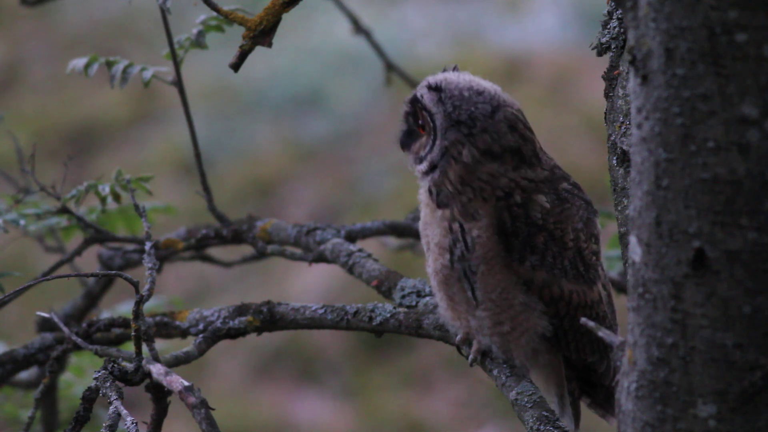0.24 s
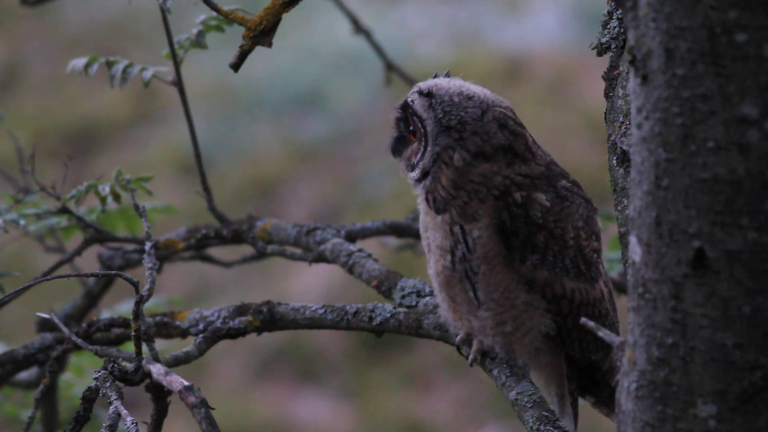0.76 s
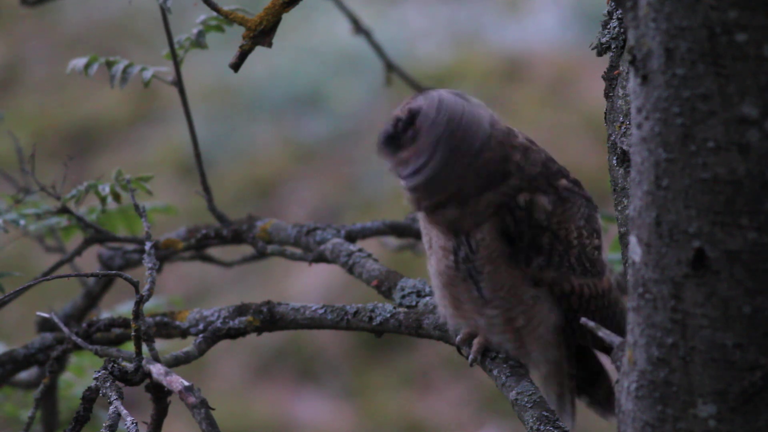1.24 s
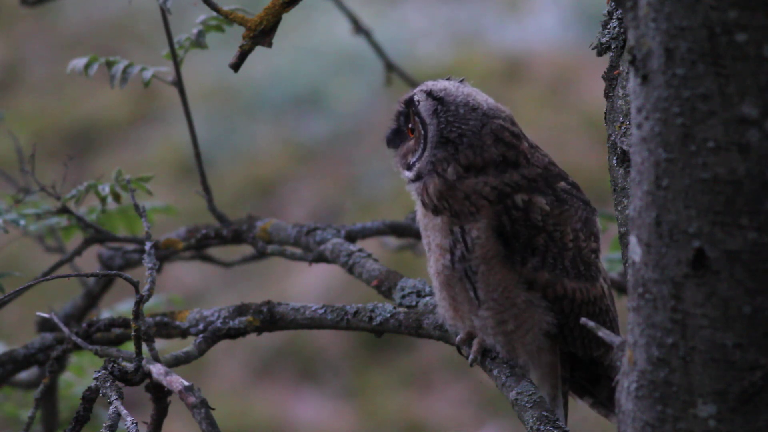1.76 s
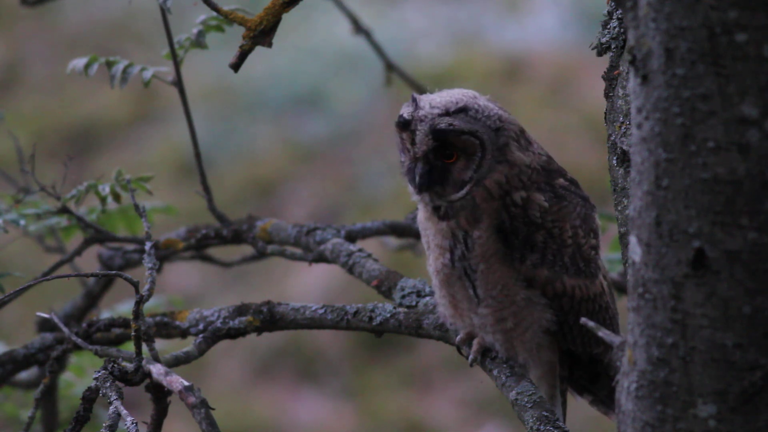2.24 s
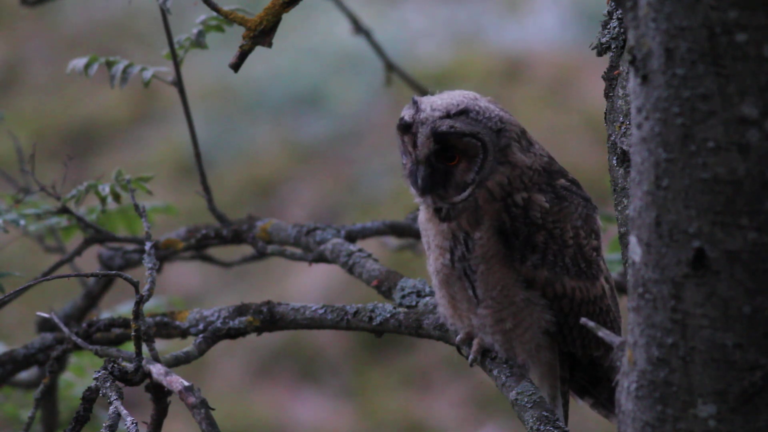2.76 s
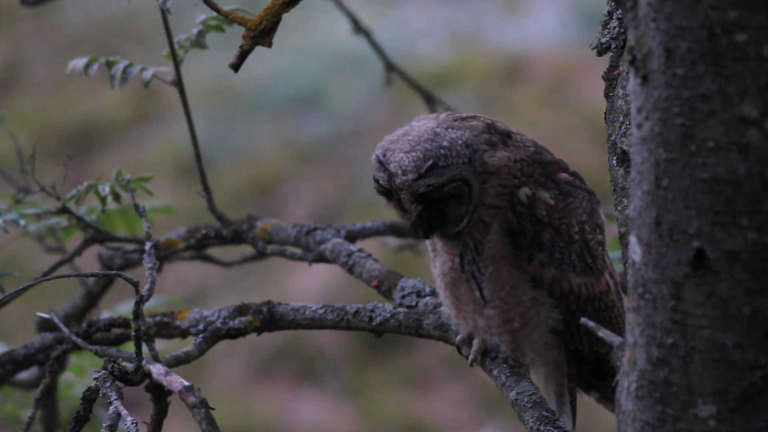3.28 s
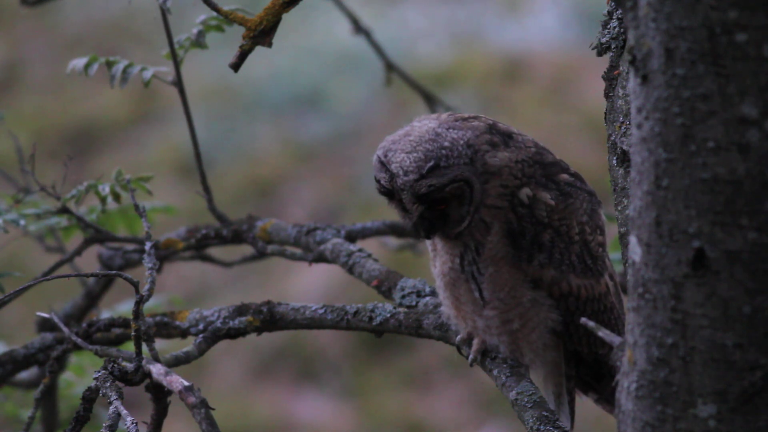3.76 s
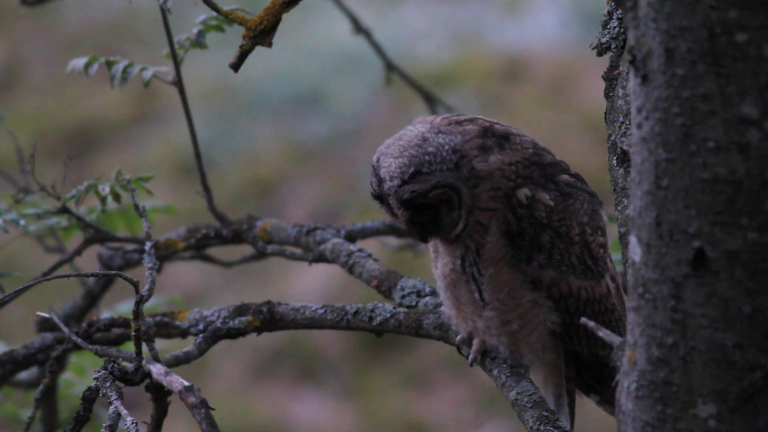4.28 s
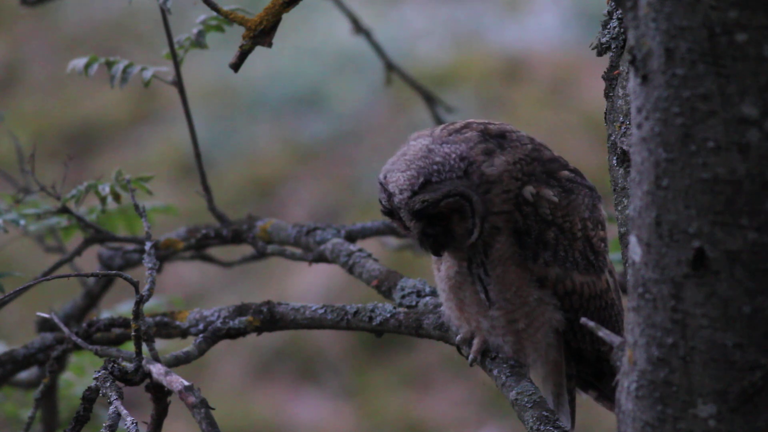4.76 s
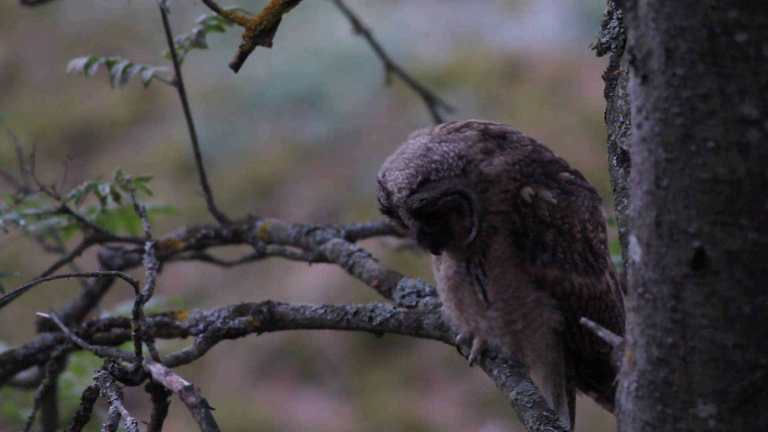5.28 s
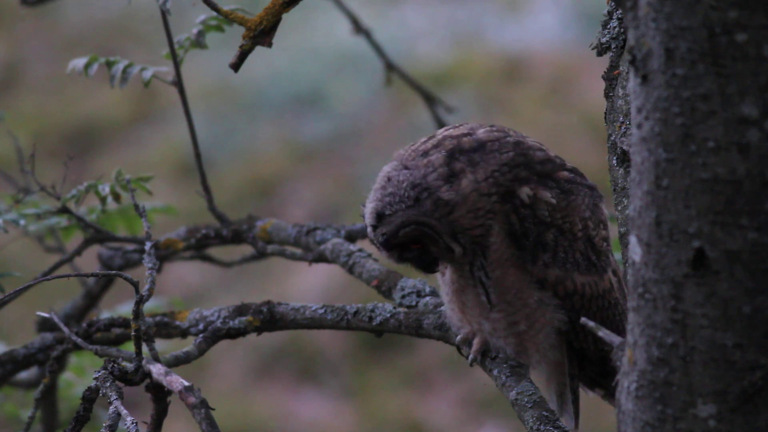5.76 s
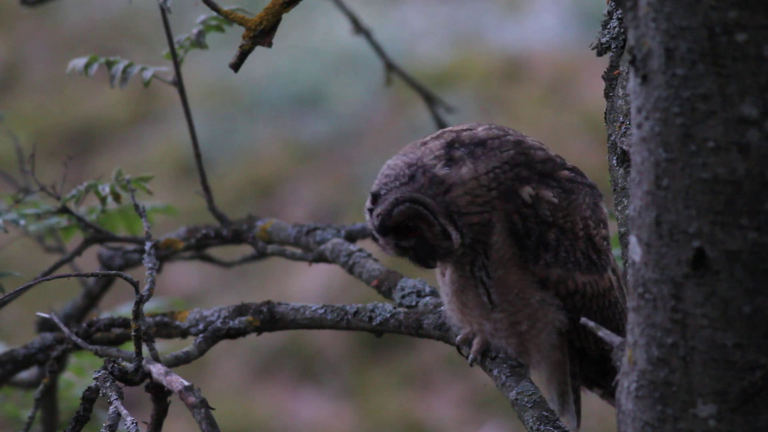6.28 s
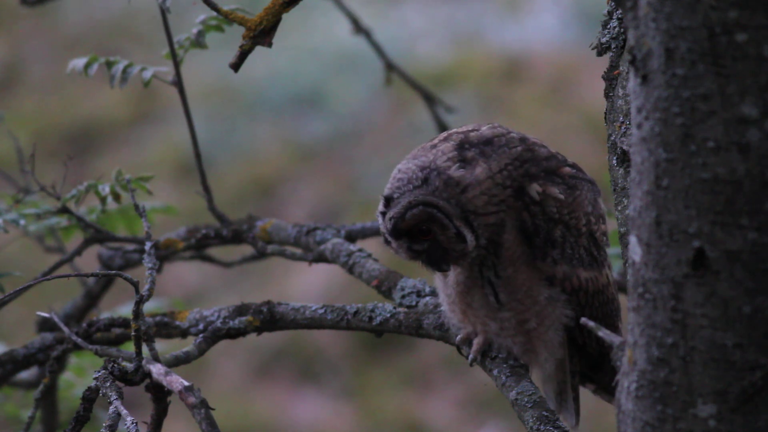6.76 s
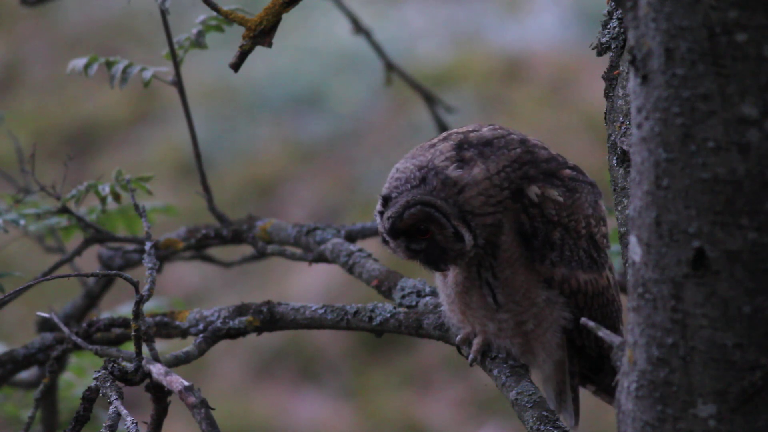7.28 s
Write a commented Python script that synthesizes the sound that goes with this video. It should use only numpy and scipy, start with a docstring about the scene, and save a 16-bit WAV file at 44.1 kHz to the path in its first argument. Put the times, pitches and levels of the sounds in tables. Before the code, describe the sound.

In quiet open woodland, a small bird ticks sharply and another whistles far off over a soft rush of air. After two dry taps, a young owl close to the microphone gives one loud falling squeal that cracks into a rasp. Faint chirps and more ticks follow. Then a distant whistle leads into a thinner, higher squeal, and a second chick overlaps it. The calls echo lightly among the trees.

```python
"""Young owls begging in open woodland.

Close to the microphone a chick gives one loud falling squeal that cracks into a rasp. Later a faint far
whistle leads into a thinner, higher squeal, and a second chick joins. A small bird ticks; others sing far
off. Trees and ground scatter the calls over a soft rush of air, rustles, taps and light puffs of wind."""
import sys
import numpy as np
from scipy import signal
from scipy.fft import rfft, irfft, next_fast_len
from scipy.io import wavfile
from scipy.ndimage import map_coordinates

SR = 44100
rng = np.random.default_rng(int(sys.argv[2]) if len(sys.argv) > 2 else 0)


def master(y):
    """Save y as 16-bit WAV."""
    cut = np.clip(np.atleast_2d(y).T, -1, 1)
    pcm = np.round(cut * 32767)  # scale
    wavfile.write(sys.argv[1], SR, pcm.astype(np.int16))


N = 332073


def amp(db):
    """Decibels to gain."""
    return 10 ** (np.asarray(db) / 20)


def unit(x):
    """x scaled to rms 1."""
    return x / np.sqrt(np.mean(x ** 2) + 1e-20)


def along(points, hz):
    """Read (frequency [Hz], value) points at hz, on a log frequency axis."""
    freqs, values = np.transpose(points)
    return np.interp(np.log(hz + 1), np.log(freqs), values)


def filtered(x, response):
    """x through a filter whose gain is response(hz)."""
    size = next_fast_len(len(x) + SR // 4)
    return irfft(rfft(x, size) * response(np.fft.rfftfreq(size, 1 / SR)), size)[:len(x)]


def noise(spectrum, size):
    """Noise of rms 1, coloured by (frequency [Hz], density [dB]) points."""
    return unit(filtered(rng.standard_normal(size), lambda hz: amp(along(spectrum, hz))))


def wobble(rate, size):
    """A smooth random curve with rate knots a second."""
    knots = rng.standard_normal(int(size * rate / SR) + 4)
    return map_coordinates(knots, [np.arange(size) * rate / SR])


def bump(t, s, length):
    """A smooth swell of height 1 around time s."""
    return np.exp(-((t - s) / length) ** 2)


def gate(t, start, end, attack, release):
    """A straight rise, a hold at 1 and a straight fall."""
    return np.clip(np.minimum((t - start) / attack, (end - t) / release), 0, 1)


def add(track, s, x):
    """Mix x into the track from time s."""
    i = round(s * SR)
    track[i:i + len(x)] += x[:max(N - i, 0)]


def woodland(x, near_db, far_db, near_t60):
    """Ground and near trunks give a cluster of separate echoes; the far trees give a long soft tail."""
    # ring of the far trees: (frequency [Hz], time to fall 60 dB [s])
    tail_t60 = [(500, 0.59), (2500, 1.27), (5000, 0.97), (8000, 0.67), (14000, 0.12)]
    t = np.arange(SR) / SR
    delays = np.sort(rng.uniform(.003, .14, 90))
    echo_gains = rng.choice([-1, 1], len(delays)) * amp(-60 * delays / near_t60)
    near = np.bincount((delays * SR).astype(int), echo_gains, SR)
    hz, age, bands = signal.stft(rng.standard_normal(SR), SR, nperseg=256)
    fading = bands * amp(-60 * age / along(tail_t60, hz)[:, None])
    far = signal.istft(fading, SR, nperseg=256)[1][:SR] * (1 - np.exp(-t / 0.017))
    echoes = amp(near_db) * near / np.linalg.norm(near) + amp(far_db) * far / np.linalg.norm(far)
    return x + signal.fftconvolve(x, echoes)[:N]


def air(level_db=-53.5):
    """The steady rush of the open wood, all around the microphone."""
    # colour of the rush: (frequency [Hz], density [dB])
    rush_colour = [(15, -40), (25, -9.5), (55, -11), (133, -5.5), (461, 0.5), (572, -2), (881, -5),
                   (1360, -8.5), (1730, -9.5), (2030, -12), (3990, -16), (4450, -16), (7420, -20),
                   (12400, -19), (15800, -31)]
    return amp(level_db + 0.15 * wobble(3.8, N)) * noise(rush_colour, N)


def leaves(hiss_db=-62.5, sag_db_per_s=0.54):
    """Leaves hiss faintly, slowly fading, and stir now and then."""
    # colour of the foliage: (frequency [Hz], density [dB])
    leaf_colour = [(400, -25), (1200, 3), (2500, 2), (4000, -2.5), (8000, -7), (12500, -3), (15800, -12)]
    # stirs: (time [s], half-width [s], level [dB], brightness [dB per octave])
    stirs = [(1.335, 0.12, -59.5, -1), (1.66, 0.29, -57.5, 0.5), (3.2, 0.29, -68, 0),
             (3.97, 0.29, -62.5, 2)]
    t = np.arange(N) / SR
    hiss = noise(leaf_colour, N)
    rustle = amp(hiss_db - sag_db_per_s * t) * hiss
    for s, width, db, brightness in stirs:
        tilted = filtered(hiss, lambda hz: amp(brightness * np.log2(hz + 1)))
        rustle += amp(db) * bump(t, s, width) * unit(tilted)
    return rustle * amp(0.68 * wobble(25, N))


def wind_puffs(half_width_s=0.025):
    """Light puffs of wind hit the microphone as short low rumbles."""
    # puffs: (time [s], level [dB])
    puffs = [(.89, -62), (1.68, -63), (2.25, -63), (2.335, -58.5), (2.428, -48), (2.6, -53), (2.66, -56),
             (4.112, -56), (4.2, -61), (4.524, -58), (4.622, -59), (4.99, -56.5), (6.051, -64), (6.37, -59),
             (6.964, -55)]
    # colour of wind on the microphone: (frequency [Hz], density [dB])
    rumble_colour = [(20, -15), (45, 0.5), (75, 0), (130, -16), (300, -29), (1000, -80)]
    t = np.arange(N) / SR
    return sum(amp(db) * bump(t, s, half_width_s) for s, db in puffs) * noise(rumble_colour, N)


def taps_and_twigs(tap_t60=0.021, twig_t60=0.031):
    """Two small dry taps on wood and three bright clicks, as of twigs: noise bursts that die at once."""
    # taps on wood: (time [s], level [dB], pitch [Hz])
    taps = [(1.661, -34, 1380), (1.735, -46.5, 1220)]
    # twig clicks: (time [s], level [dB])
    clicks = [(1.775, -44), (3.035, -46), (6.025, -48)]
    out, t = np.zeros(N), np.arange(SR // 16) / SR
    for s, db, hz in taps:
        knock = noise([(hz / 4, -25), (hz, 0), (hz * 1.3, -8), (hz * 6, -24)], len(t))
        add(out, s, amp(db - 60 * t / tap_t60) * knock * (1 - np.exp(-t / 0.00088)))
    for s, db in clicks:
        click = noise([(2000, -20), (8000, -7), (12000, 0), (15800, -10)], len(t))
        add(out, s, amp(db - 60 * t / twig_t60) * click * (1 - np.exp(-t / .002)))
    return out


def note(hz, waver):
    """A small bird's pure note, swelling and fading along a slightly unsteady pitch curve."""
    swell = np.sqrt(abs(np.sin(np.linspace(0, np.pi, len(hz)))))
    pitch = hz * (1 + waver * wobble(524, len(hz)))
    return swell * np.sin(2 * np.pi * np.cumsum(pitch) / SR)


def far_songbirds(top_hz=2506, low_hz=1106, fall_s=.021):
    """Far off in the trees one bird whistles level notes; another's chirps all drop along one glide."""
    # level notes: (time [s], length [s], pitch [Hz], level [dB])
    whistles = [(.52, 0.039, 1915, -60.5), (.67, .032, 2115, -60), (.71, .044, 2390, -58.5),
                (.776, .04, 2230, -60), (.82, .08, 2180, -64)]
    # falling chirps: (time [s], length [s], level [dB])
    chirps = [(2.669, .042, -54), (2.803, 0.021, -53.5), (2.86, 0.038, -50), (3.11, 0.038, -50),
              (3.24, 0.018, -50.5), (3.298, 0.036, -50.5)]
    out = np.zeros(N)
    for s, length, hz, db in whistles:
        add(out, s, amp(db) * note(np.full(int(length * SR), hz), waver=0.02))
    for s, length, db in chirps:
        t = np.arange(0, length, 1 / SR)
        hz = low_hz + (top_hz - low_hz) / (1 + (t / fall_s) ** 2)
        add(out, s, amp(db) * hz / top_hz * note(hz, waver=0.025))  # softer as it falls
    return woodland(out, near_db=-0.5, far_db=-10, near_t60=.5)


def alarm_ticks(foliage_t60=0.39):
    """A small bird ticks: each harsh note flicks upward in a few milliseconds; foliage scatters it."""
    # ticks: (time [s], relative level [dB], centre pitch [Hz])
    ticks = [(0.429, -41, 7060), (0.6113, -39, 7530), (0.6793, -45, 7410), (0.7714, -43, 6826),
             (0.9767, -44, 7110), (1.263, -45.5, 6890), (1.524, -44, 6900), (4.167, -41, 7200),
             (4.2275, -42, 6860), (4.329, -40.5, 7020), (4.399, -38.5, 6997), (4.492, -42, 6770),
             (4.605, -39.5, 6820), (7.4535, -43, 7030), (7.5204, -43, 6890)]
    out, t = np.zeros(N), np.arange(SR // 8) / SR
    for s, db, hz in ticks:
        sweep = hz * (1 + 0.172 * np.tanh((t - .005) / 0.0062) + 0.048 * wobble(2790, len(t)))
        snap_colour = [(hz * 0.53, -30), (hz * 0.75, -9), (hz, 0), (hz * 1.1, -4), (hz * 1.57, -28)]
        snap = noise(snap_colour, len(t))
        flick = (np.sin(2 * np.pi * np.cumsum(sweep) / SR) + 0.43 * snap) * bump(t, .005, 0.0034)
        foliage = rng.standard_normal(len(t)) * amp(-60 * t / foliage_t60)
        scatter = signal.fftconvolve(flick, foliage)[:len(t)]
        add(out, s - .002, amp(db - 1) * (flick + amp(-1.5) * unit(scatter) * flick.std()))
    return out


def strain(t, stretches, rise_s, fall_s):
    """Each strained stretch of the voice builds slowly and lets go faster."""
    return sum(amp(db) * gate(t, start, end, rise_s, fall_s) for start, end, db in stretches)


def squeal_pitch(t, top_hz, hold_s, slide_s, low_hz, scoop_s, drop, scoop=.1, catch=None, drop_s=0.0132):
    """The pitch scoops up, holds and slides as the effort fades; it may catch, or drop at the end."""
    age = t - t[0]
    hz = low_hz + (top_hz - low_hz) / (1 + (np.maximum(age - hold_s, 0) / slide_s) ** 2)
    if catch:
        s, length, depth_hz = catch
        progress = np.maximum(t - s, 0) / length
        hz = hz - depth_hz * (progress * np.exp(1 - progress)) ** 2
    onset = 1 - scoop * np.exp(-age / scoop_s)
    collapse = 1 - drop * np.exp((t - t[-1]) / drop_s)
    return hz * onset * collapse


def squeal(call, throat, rasp_colour, jitter, shake, flutter_db, hiss_db):
    """One syrinx note; under strain its cycles alternate (an undertone) and then break into a rasp."""
    # colour of the undertone, whose partials lie between the harmonics: (frequency [Hz], level [dB])
    undertone_colour = [(1100, -26.5), (1260, -9.5), (2200, 2), (3300, -16), (3800, -1.5), (5500, 2),
                        (8000, -5), (10000, -4.5), (15000, -18)]
    start, end = call["start"], call["end"]
    t = np.arange(start, end, 1 / SR)
    n = len(t)
    hz = squeal_pitch(t, **call["pitch"])
    swells_db = sum(db * bump(t, s, width) for s, width, db in call.get("swells", []))
    level_db = call["level_db"] - call["sag_db_per_s"] * (t - start) + swells_db
    rasp = amp(call["rasp_db"]) + strain(t, call.get("crack", []), rise_s=0.084, fall_s=0.065)
    undertone = strain(t, call.get("undertone", []), rise_s=.09, fall_s=0.023)
    phase = 2 * np.pi * np.cumsum(hz * (1 + jitter * wobble(220.2, n))) / SR
    phase += shake * rasp * wobble(900, n)  # uneven cycles spread each overtone
    tone = sum(amp(along(throat, k * hz) + flutter_db * wobble(45.67, n)) * np.sin(k * phase)
               for k in range(1, 9))
    tone *= 1 + 0.2 * rasp * wobble(700, n)  # the cycles also differ in strength
    slip = 0.5 * wobble(124.6, n)  # the alternation is unsteady
    halves = sum(amp(along(undertone_colour, k * hz) + 4.5 * wobble(42.0, n)) * np.sin(k * phase + slip)
                 for k in np.arange(7) + .5)
    hiss = noise(rasp_colour, n) * (1 + .5 * np.cos(phase)) * amp(1.5 * wobble(72.5, n))
    voice = unit(tone) + undertone * unit(halves) + rasp * amp(hiss_db) * unit(hiss)
    out = np.zeros(N)
    add(out, start, gate(t, start, end, call["attack_s"], call["release_s"]) * amp(level_db) * voice)
    return out


def owl_chicks():
    """The chicks beg from their perches, and the wood echoes each squeal on its way to the microphone."""
    # squeals: start, end [s]; scoop, drop [share of pitch]; catch (time [s], length [s], depth [Hz]);
    # swells (time [s], half-width [s], gain [dB]); undertone, crack (from [s], to [s], level [dB])
    falling_call = dict(start=1.809, end=2.388, level_db=-23.5, sag_db_per_s=8, attack_s=0.013, release_s=.042, swells=[(1.997, 0.034, 4),
                    (2.18, 0.014, -3), (2.3, .012, -7)],
                    pitch=dict(top_hz=2213.5, hold_s=.14, slide_s=.23, low_hz=1809, scoop_s=0.00714, drop=0, catch=(1.848, .03, 111.2)),
                    undertone=[(1.815, 1.87, -18.5), (1.925, 2.175, -13.5)],
                    rasp_db=-35.5, crack=[(2.045, 2.205, -15.5)])
    thin_call = dict(start=4.74, end=5.264, level_db=-30, sag_db_per_s=1.5, attack_s=0.013, release_s=0.05, swells=[(4.878, 0.047, 3.5),
                 (4.943, 0.0099, -7.5), (5.19, 0.036, 2)],
                 pitch=dict(top_hz=2563, hold_s=.165, slide_s=.18, low_hz=2448, scoop_s=.016, drop=0.12),
                 undertone=[(4.76, 4.9, -25), (4.93, 5.26, -19.5)], rasp_db=-25)
    joining_call = dict(start=5.045, end=5.524, level_db=-33, sag_db_per_s=6.5, attack_s=0.013, release_s=0.032, pitch=dict(top_hz=2605, hold_s=.14, slide_s=.275, low_hz=2293, scoop_s=.015, drop=0.098),
                    undertone=[(5.25, 5.53, -20.5)], rasp_db=-28)
    far_call = dict(start=4.555, end=4.85, level_db=-49, sag_db_per_s=10, attack_s=0.076, release_s=0.02, pitch=dict(top_hz=2536, hold_s=.3, slide_s=.2, low_hz=2450, scoop_s=.017, scoop=0.2, drop=0, catch=(4.595, 0.049, 65.2)),
                rasp_db=-30)
    # throat and beak, through which each call's overtones glide: (frequency [Hz], gain [dB])
    falling_throat = [(1950, -14), (2150, -11), (3750, -5.5), (4200, 0.5), (5800, 1), (6600, -8),
                      (7700, -4.5), (8600, -3.5), (9800, -12), (11000, -12), (11600, -22), (13000, -18.5),
                      (15500, -28)]
    thin_throat = [(2500, -9), (4500, 6.5), (5050, 1), (7600, -12), (10200, -14.5), (12800, -23.5),
                   (15300, -45)]
    joining_throat = [(2440, -7), (2600, -4), (4850, 3.5), (5200, -4.5), (7500, -9), (10300, -9.5),
                      (12800, -25), (15300, -40)]
    far_throat = [(2500, 1.5), (5000, -14), (7600, -11.5), (10000, -31)]
    # hiss of a rasping voice: (frequency [Hz], density [dB])
    falling_rasp = [(1200, -38), (2800, -37), (4300, -5), (6000, 7), (8500, -13), (9700, -3), (11200, -17),
                    (12600, -4), (15500, -20)]
    thin_rasp = [(1200, -39), (3200, -26), (4450, -0.5), (5400, -6), (6300, 1), (7500, -11), (9500, -10),
                 (11500, -9), (15500, -33)]
    falling = squeal(falling_call, falling_throat, falling_rasp,
                     jitter=0.0039, shake=0.34, flutter_db=2, hiss_db=2.5)
    thin = squeal(thin_call, thin_throat, thin_rasp,
                  jitter=0.0013, shake=0.29, flutter_db=2.5, hiss_db=3.5)
    joining = squeal(joining_call, joining_throat, thin_rasp,
                     jitter=0.0012, shake=0.33, flutter_db=2, hiss_db=3)
    far = squeal(far_call, far_throat, thin_rasp, jitter=0.003, shake=0.26, flutter_db=1.5, hiss_db=-3)
    return (woodland(falling, near_db=-3.5, far_db=-21, near_t60=0.31)
            + woodland(thin + far, near_db=-7, far_db=-14, near_t60=0.19)
            + woodland(joining, near_db=-2.5, far_db=-14.5, near_t60=0.25))


def scene():
    """The wood as it reaches one microphone."""
    birds = owl_chicks() + alarm_ticks() + far_songbirds()
    return (birds + taps_and_twigs() + air() + leaves() + wind_puffs())[None]


def record(dry):
    """The microphone chain passes nothing above its band limit."""
    top_hz = 15850
    return np.array([filtered(channel, lambda hz: hz < top_hz) for channel in dry])


dry = scene()
out = record(dry)
master(out)
```